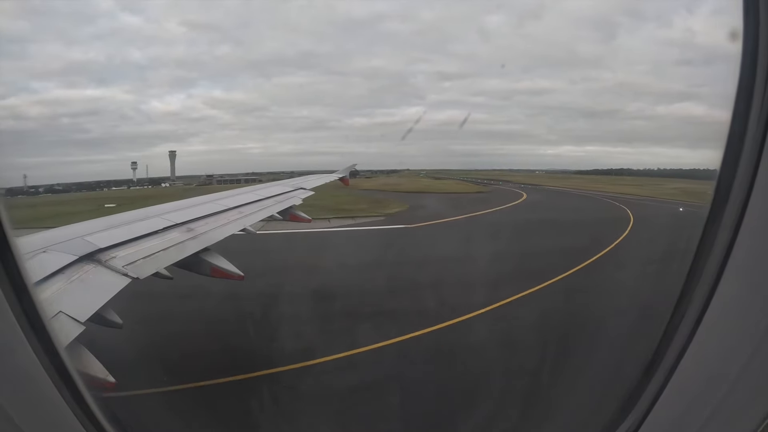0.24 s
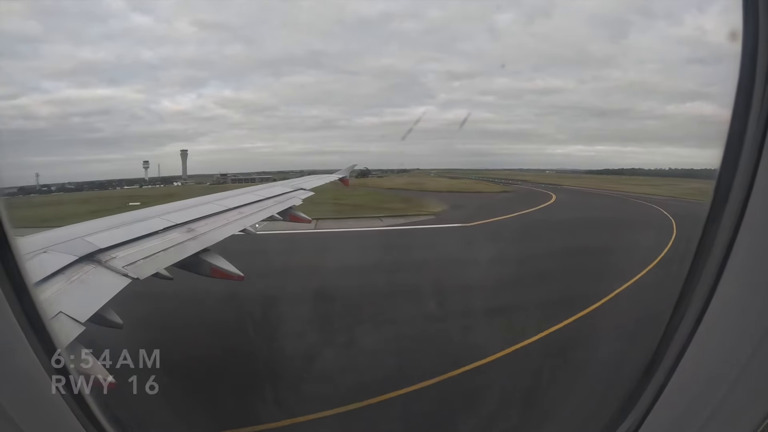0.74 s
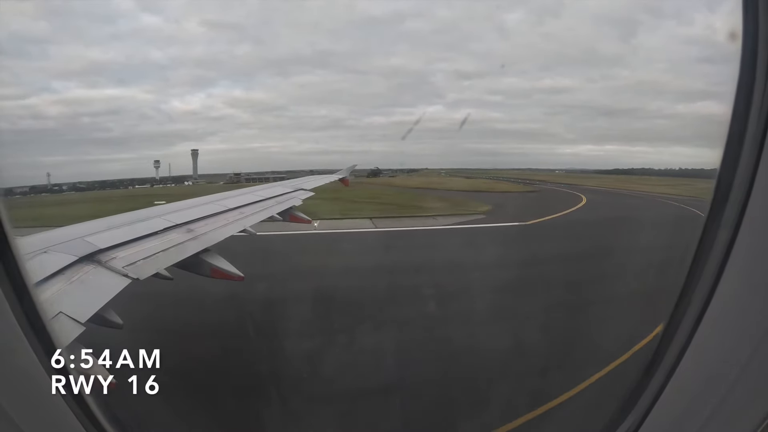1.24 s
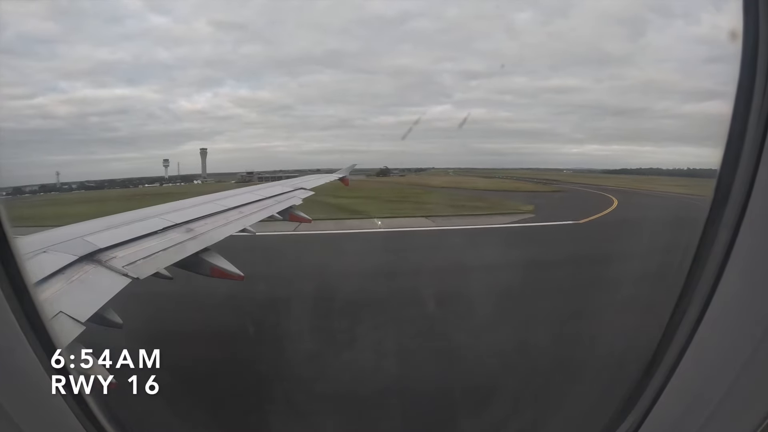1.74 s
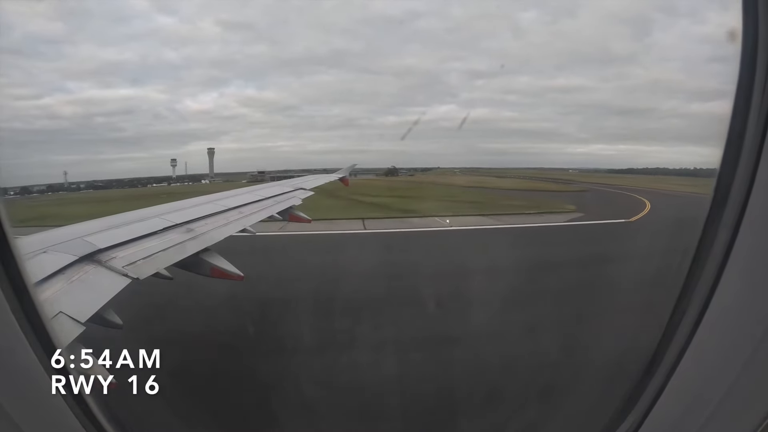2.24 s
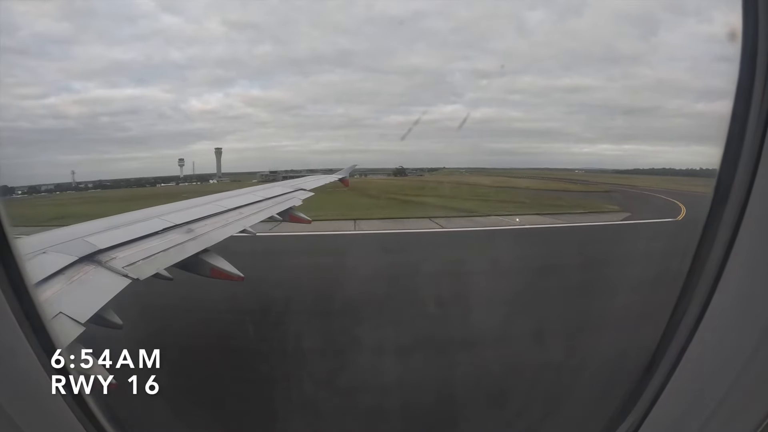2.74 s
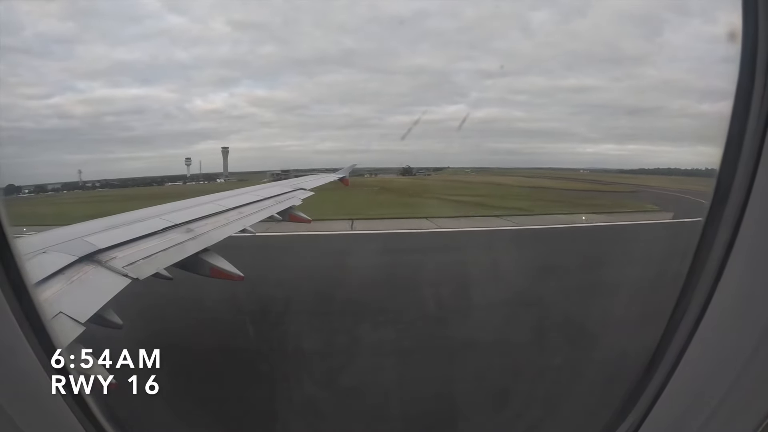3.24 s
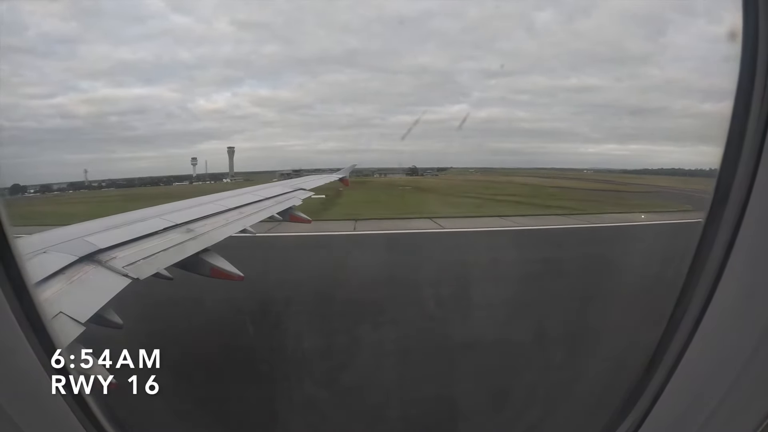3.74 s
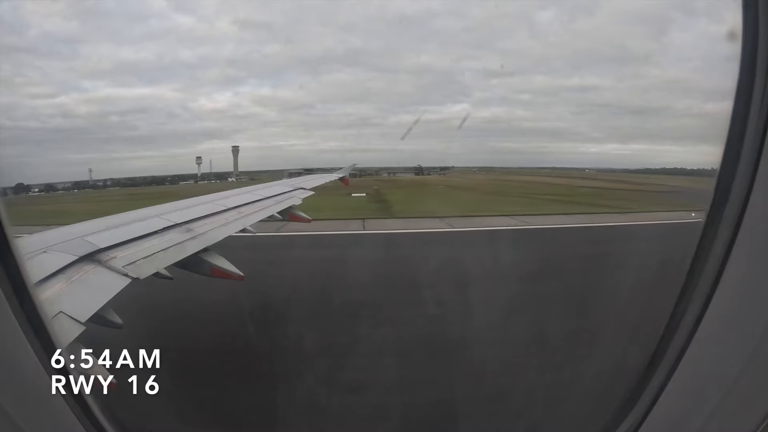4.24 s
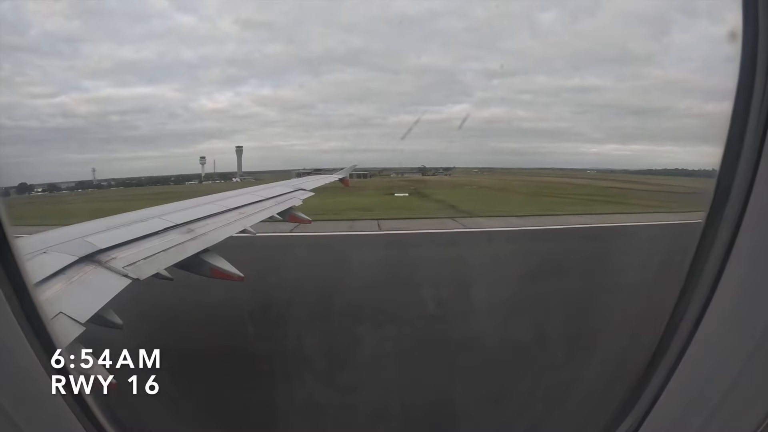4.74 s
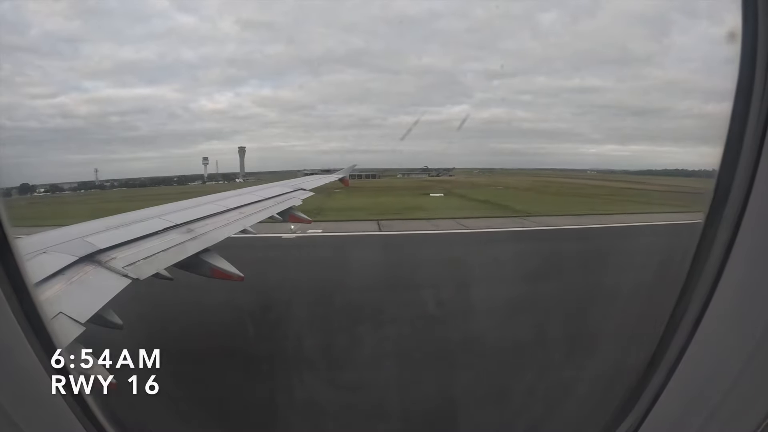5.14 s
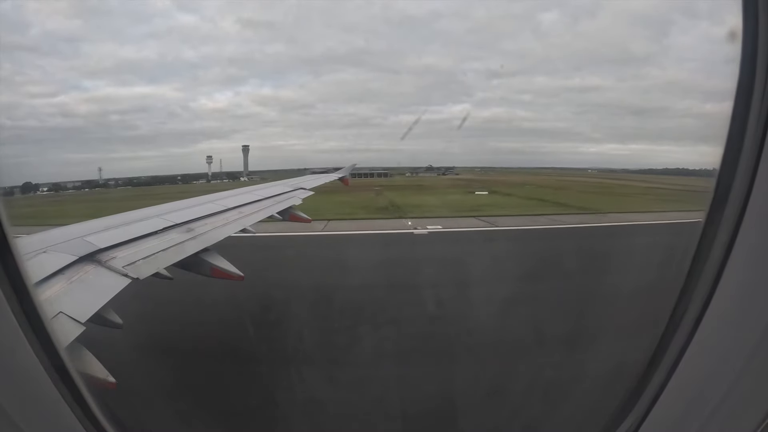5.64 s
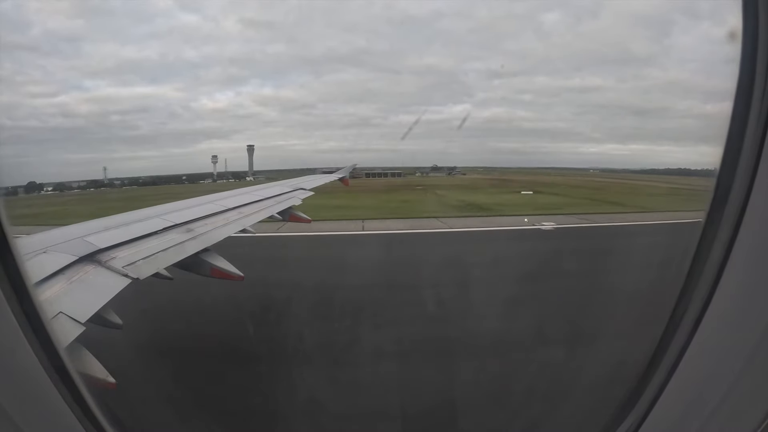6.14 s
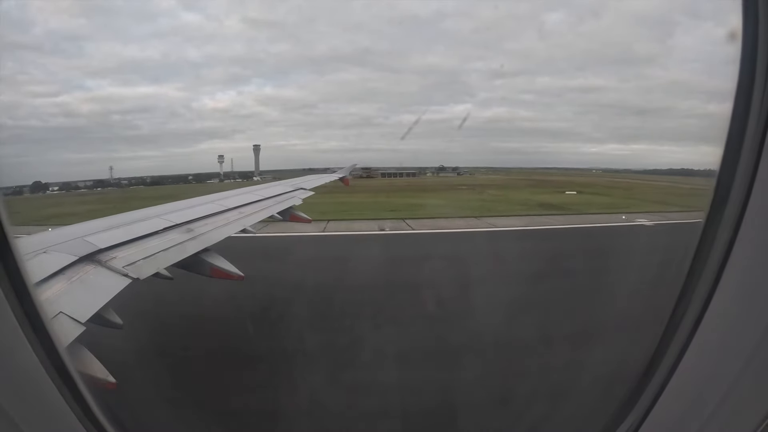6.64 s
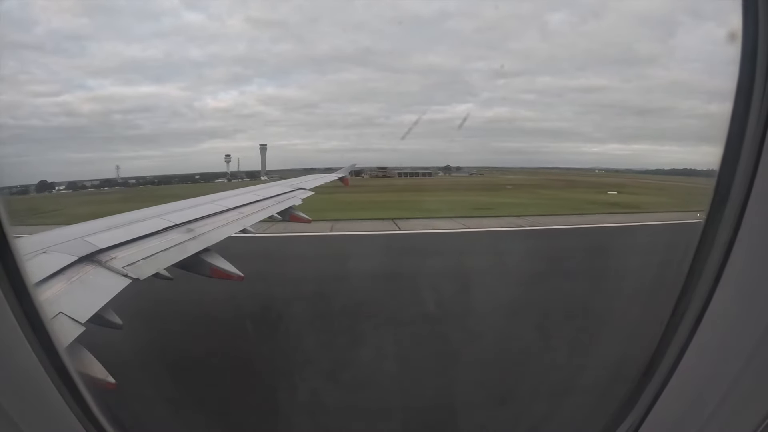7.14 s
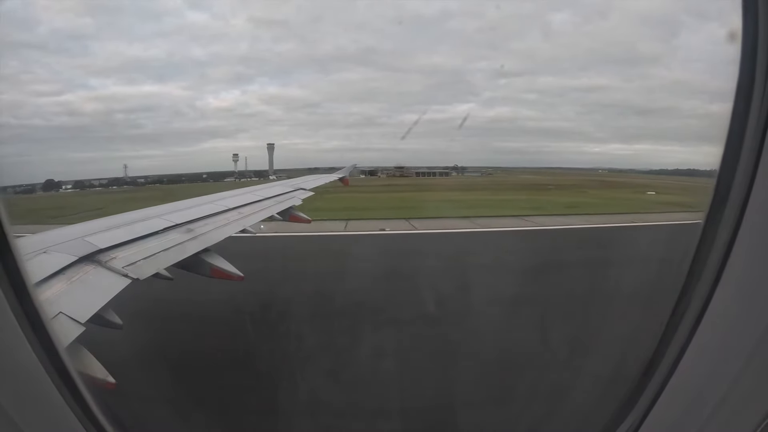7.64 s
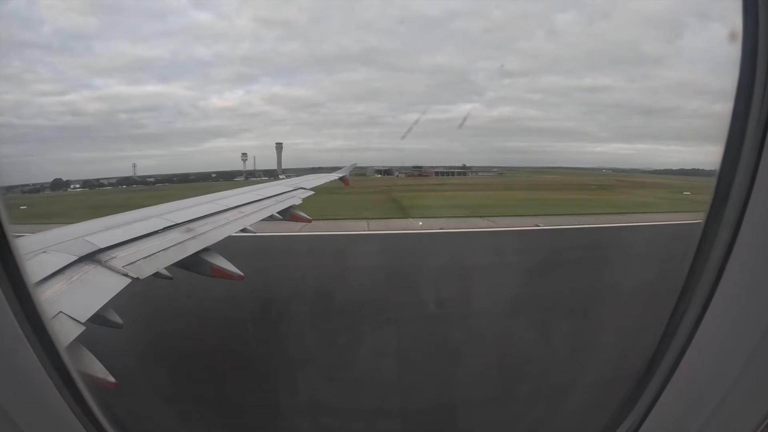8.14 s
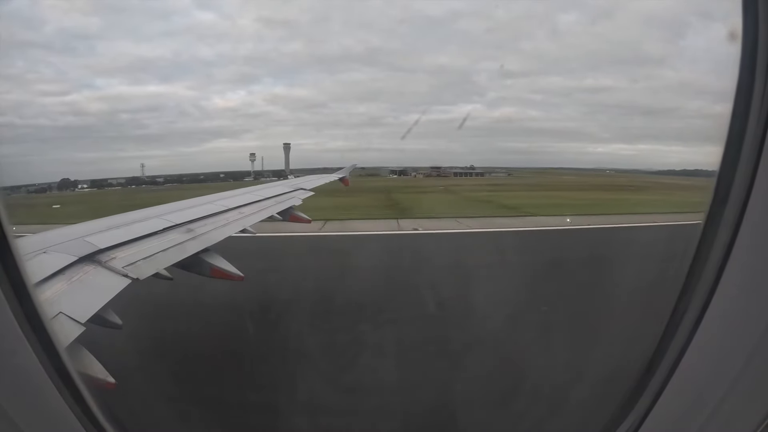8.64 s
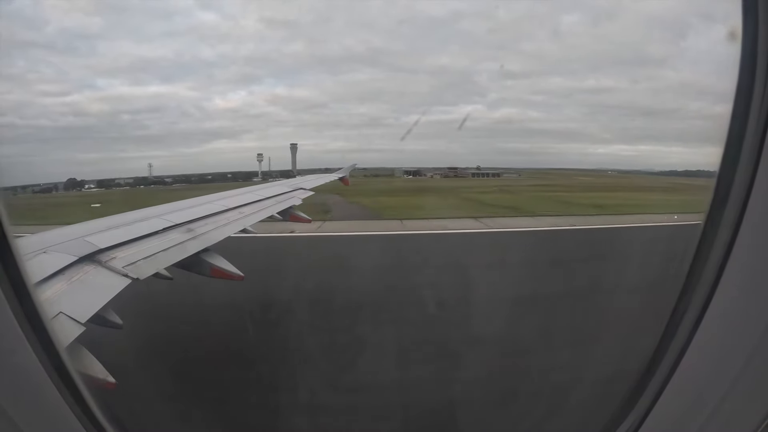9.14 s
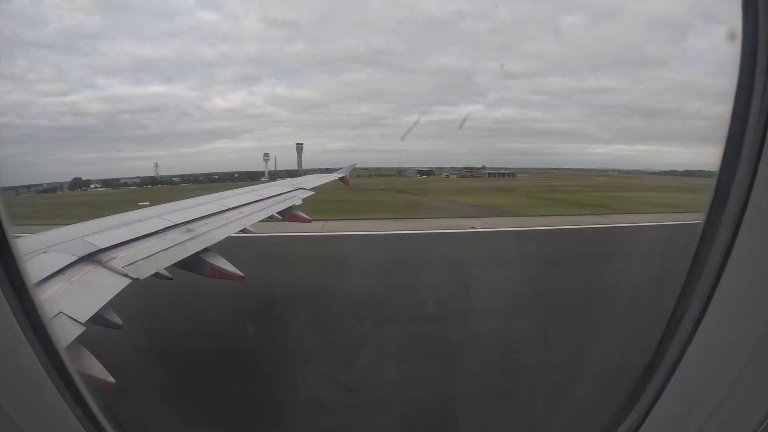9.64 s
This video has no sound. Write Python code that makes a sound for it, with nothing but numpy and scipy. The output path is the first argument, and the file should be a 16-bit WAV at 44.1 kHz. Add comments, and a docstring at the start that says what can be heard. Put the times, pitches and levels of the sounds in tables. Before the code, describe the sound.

Inside an airliner cabin, jet engines spool up with a climbing whine into a loud, steady, booming roar while plastic trim rattles constantly.

```python
"""Inside an airliner cabin, stereo microphone at a window seat by the wing, as the take-off roll begins.
Rubbing trim squeaks, then now and again later: short rough notes. The compressor whine climbs for three seconds
and blurs, lower engine tones swell and pass, and the roar and boom of the fuselage, resonant noise, grow
with thrust, then hold steady. Loose plastic rattles on top, gritty cracks of noise; air hisses throughout.
A small recorder's limiter holds the peaks down."""
import sys
import numpy as np
from scipy import signal
from scipy.fft import rfft, irfft
from scipy.io import wavfile
from scipy.ndimage import uniform_filter1d, minimum_filter1d

SR = 44100
rng = np.random.default_rng(int(sys.argv[2]) if len(sys.argv) > 2 else 0)


def file_out(sig):
    """Save sig as 16-bit WAV at sys.argv[1]."""
    # one column per channel
    cols = np.atleast_2d(sig).T
    # limit, then scale
    lim = np.clip(cols, -1, 1)
    pcm = np.round(lim * 32767).astype(np.int16)
    wavfile.write(sys.argv[1], SR, pcm)


N = 436590
TIME = np.arange(N) / SR
FREQS = np.maximum(np.fft.rfftfreq(N, 1 / SR), 1)

# engine spool-up: time_s [s], whine_hz [Hz], whine_db [dB], thrust [0-1]
SPOOL = [(0, 4970, -68, 0.05), (.5, 5400, -67.5, 0.08), (.9, 5780, -67.5, 0.24), (1.2, 6030, -66, 0.5),
         (1.5, 6500, -67, 0.78), (2, 6720, -70, 0.72), (2.5, 7120, -71, 0.95), (2.8, 7120, -71, 0.98),
         (9.9, 7470, -71.5, 0.99)]
# the loudest knocks of loose trim: start_s [s], level_db [dB, relative], edge_db [dB of extra treble]
KNOCKS = [(0.6838, -44.5, -2), (0.8507, -40, -3), (0.8914, -44.5, -1), (1.361, -37, -2), (1.54, -37, 7),
          (1.6552, -41.5, 2), (1.8144, -36, 4), (1.8714, -41, -2), (2.0263, -34.5, 0), (2.0337, -38, 0),
          (2.056, -39.5, -2), (2.063, -40, -2), (2.181, -40, -6), (2.212, -38.5, 4), (2.362, -40.5, 3),
          (2.4848, -36, -1), (2.492, -37.5, -3), (2.62, -36.5, 0), (2.6226, -36, -3), (2.6293, -37.5, 0),
          (2.639, -39, -4), (2.656, -42, -5), (2.7485, -38.5, -2), (2.7684, -41.5, 1), (2.7814, -36, 2),
          (2.805, -42, -4), (2.905, -39, 2), (2.9943, -39, 0), (3.017, -38, 3), (3.0293, -42, 0),
          (3.0365, -38.5, 1), (3.044, -38.5, 1), (3.0858, -37.5, 3), (3.1474, -41, 0), (3.155, -39.5, 0),
          (3.2274, -34.5, -5), (3.2632, -39, 8), (3.3468, -40.5, 3), (3.4, -40, 0), (3.453, -39, -2),
          (3.5004, -39.5, -9), (3.5114, -37.5, -3), (3.5922, -40.5, 8), (3.6245, -38, 2),
          (3.6567, -39.5, 3), (3.6741, -36.5, -7), (3.8438, -39, -2), (3.853, -37.5, -5),
          (3.897, -37.5, -6), (3.955, -39.5, -7), (3.9893, -40.5, 2), (4.061, -40, -2), (4.071, -35.5, 0),
          (4.1904, -41, -2), (4.225, -38.5, -1), (4.3296, -39, -4), (4.354, -38.5, -2), (4.4787, -37, -3),
          (4.51, -38.5, -4), (4.6047, -39.5, 4), (4.7644, -38.5, 5), (4.7736, -38, 0), (4.7872, -36, 2),
          (4.8609, -39, 5), (4.92, -38, -2), (4.973, -35, 1), (5.0313, -36, -1), (5.044, -39, -1),
          (5.1106, -41, -3), (5.1572, -38.5, -4), (5.1642, -36.5, -1), (5.3484, -39.5, -4),
          (5.3953, -41, -3), (5.5934, -38.5, -8), (5.6465, -35.5, 2), (5.6641, -40, 1), (5.6755, -37.5, -2),
          (5.8512, -40, 3), (5.865, -41.5, 1), (5.9763, -35, 1), (5.9998, -39.5, -3), (6.0914, -40.5, -2),
          (6.1274, -41.5, 0), (6.152, -37, 1), (6.266, -37, -5), (6.2759, -39.5, -2), (6.3615, -41.5, -2),
          (6.37, -41.5, 0), (6.3893, -41, 2), (6.4855, -39.5, 0), (6.502, -39, 0), (6.5179, -38, 1),
          (6.5762, -39.5, 1), (6.9255, -39.5, 0), (6.9971, -40, -2), (7.1077, -40.5, 0), (7.1311, -39, 5),
          (7.1863, -34.5, 1), (7.2877, -37, 2), (7.3067, -40, -2), (7.3496, -40, -5), (7.371, -35, -4),
          (7.4118, -40.5, 0), (7.421, -39.5, -2), (7.472, -37, -5), (7.4792, -38, -3), (7.653, -36.5, -2),
          (7.666, -38, -2), (7.7942, -41, -3), (7.905, -37, 4), (7.9554, -40, -7), (8.1074, -40, -3),
          (8.1835, -39.5, 1), (8.1986, -36, -1), (8.241, -37, -8), (8.3287, -39, 0), (8.3432, -40, -6),
          (8.3973, -38.5, 3), (8.681, -39, -6), (8.7584, -38, -3), (8.772, -34, 1), (8.8236, -37.5, -3),
          (8.8384, -37.5, -2), (8.873, -37, -2), (8.8817, -39.5, -3), (8.8996, -36.5, -8), (8.95, -37, -1),
          (8.9584, -38.5, -2), (8.9674, -37.5, -5), (9.055, -41, 4), (9.0855, -36.5, -2),
          (9.1786, -36.5, -3), (9.2174, -38, -3), (9.245, -39.5, -6), (9.2578, -41, -1), (9.355, -41.5, -4),
          (9.4247, -38, 1), (9.4843, -35.5, -3), (9.562, -37.5, -5)]


def undb(db):
    """Decibels to gain."""
    return 10 ** (np.asarray(db) / 20)


def unit(x):
    """Scale to rms 1."""
    return x / np.sqrt(np.mean(x ** 2))


def curves(rows):
    """Each column of a timed table, one value per sample."""
    time_s, *columns = np.transpose(rows)
    return [np.interp(TIME, time_s, column) for column in columns]


def colour(points):
    """Gain per frequency from (Hz, dB) points."""
    hz, db = np.transpose(points)
    return undb(np.interp(np.log(FREQS), np.log(hz), db))


def resonances(modes):
    """Gain per frequency of (Hz, width Hz, dB) humps."""
    return undb(sum(db / (1 + (2 * (FREQS - hz) / width) ** 2) for hz, width, db in modes))


def shaped(x, gain):
    """Filter by a gain per frequency."""
    return irfft(rfft(x) * gain, N)


def walk(rate):
    """Smooth random wander with rms 1 that changes about rate times a second."""
    return unit(shaped(rng.standard_normal(N), np.exp(-.5 * (FREQS / rate) ** 2)))


def hump(s, half_s):
    """A smooth swell to 1 around time s."""
    return np.exp(-np.minimum(((TIME - s) / half_s) ** 2, 40))


def ports(pair, gain):
    """Two unrelated signals reach the two microphone ports: alike in the bass, partly apart in the treble."""
    # share of unrelated sound at the ports: pitch_hz [Hz], side_minus_mid_db [dB]
    width_points = [(30, -28.5), (125, -27), (250, -21.5), (500, -13.5), (1000, -7.5), (2000, -8),
                    (4000, -3.5), (8000, -7)]
    # balance of the ports: pitch_hz [Hz], left_minus_right_db [dB]
    lean_points = [(60, 0.55), (150, 0.06), (500, 0.7), (1000, 2.5), (4000, 1.5), (8000, 1.2), (12000, 3.5)]
    mid, side = rfft(pair) * gain
    side = side * colour(width_points)
    lean = np.sqrt(colour(lean_points))
    left = (mid + side) * lean
    right = (mid - side) / lean
    return irfft(np.array([left, right]), N) / np.std(irfft(mid, N))


def through_cabin(spectrum, steady_s):
    """Turbulence heard through the cabin's resonances, its level even over spans longer than steady_s."""
    # resonances of the cabin: pitch_hz [Hz], width_hz [Hz], level_db [dB]
    cabin_modes = [(101, 17, 0.5), (165.1, 9.9, 3), (211.7, 24, 2.5), (290, 30, 1.5), (368, 17, -1),
                   (390, 41, 3), (452.4, 19, 4), (1200, 60, 1), (2770, 67, 2)]
    rolloff = 1 / (1 + (FREQS / spectrum[-1][0]) ** 10)
    x = ports(rng.standard_normal((2, N)), colour(spectrum) * resonances(cabin_modes) * rolloff)
    size = int(steady_s * SR)
    power = uniform_filter1d(uniform_filter1d(np.mean(x ** 2, axis=0), size), size)
    return x / np.sqrt(power)


def tone(hz, blur_hz, blur_rate):
    """A line of rms 1, its pitch blurred by turbulence; its phase differs more between the ports when high."""
    phase = 2 * np.pi * np.cumsum(hz + blur_hz * walk(blur_rate)) / SR
    return np.sqrt(2) * np.sin(np.array([phase, phase + 1.4 * np.minimum(hz / 1200, 1)]))


def vents(thrust):
    """A smooth hiss of moving air, shaped noise a little stronger under thrust."""
    # spectrum of the hiss: pitch_hz [Hz], level_db [dB per Hz, relative]
    air_spectrum = [(1000, 2.5), (2500, 0.5), (4000, 2), (4800, -3.5), (6500, -3), (8200, -2),
                    (9200, -21.5), (12000, -18), (15000, -38.5)]
    return ports(rng.standard_normal((2, N)), colour(air_spectrum)) * undb(-64.0 + 0.8 * thrust)


def trim_squeaks():
    """Panels stick and slip as the cabin flexes: brief, rough, high notes."""
    # rubbing trim: start_s [s], length_s [s], start_hz [Hz], end_hz [Hz], level_db [dB, relative],
    # rough_hz [Hz of pitch waver, relative]
    squeak_rows = [(.185, 0.16, 3740, 3690, -62, 60), (.425, .062, 3720, 4000, -64, 45),
                   (4.305, .07, 2820, 2760, -57, 40), (5.518, 0.055, 3090, 3320, -54.5, 130),
                   (5.77, 0.049, 3320, 3360, -59, 40), (5.89, .055, 2340, 2340, -54.5, 35),
                   (5.897, 0.06, 3290, 3330, -60, 40), (6.065, .06, 2340, 2400, -55, 35),
                   (7.097, 0.048, 3520, 3630, -60, 69.6), (8.96, .085, 2380, 2345, -49, 70),
                   (9.605, 0.083, 3670, 3770, -65, 12)]
    # stick-slip rate and its spread as a share of it
    slip_hz, slip_spread = 160, 0.13
    out = np.zeros((2, N))
    slip = np.sin(2 * np.pi * np.cumsum(slip_hz * (1 + slip_spread * walk(40))) / SR)
    waver = 0.97 * slip + 0.52 * walk(200)
    for start_s, length_s, start_hz, end_hz, level_db, rough_hz in squeak_rows:
        span = slice(int(start_s * SR), min(int((start_s + length_s) * SR), N))
        progress = np.linspace(0, 1, span.stop - span.start)
        hz = start_hz + (end_hz - start_hz) * progress + rough_hz * waver[span]
        phase = 2 * np.pi * np.cumsum(hz) / SR
        # a squeak catches quickly and trails off
        swell = np.sin(np.pi * progress ** 0.7)
        out[:, span] += undb(level_db) * swell * np.sin(np.array([phase, phase + 0.72]))
    return out * undb(3.0 + 3 * slip + 2 * walk(90))


def trim_taps(thrust):
    """Energy of each light tap: they come in bouts as the cabin flexes, grow with thrust and crowd round knocks."""
    # level at full thrust, and how far the level lies from that at no thrust
    chatter_db, chatter_idle_db = -61.25, -21.5
    # unsteady flexing of the cabin: rate, its spread as a share, depth
    flex_hz, flex_spread, flex_db = 9.2, 0.29, 6.5
    # bouts that also build and ease at random: depth, rate per s
    bout_db, bout_rate = 2, 3.5
    # flurry of taps with each knock: level against the knock, half length, lag of its middle
    flurry_db, flurry_s, flurry_lag_s = -7.5, 0.044, 0.003
    # mean of the uneven gaps between taps; spread of their strength
    tap_gap_s, scatter_db = .0085, 4

    flex = np.sin(2 * np.pi * np.cumsum(flex_hz * (1 + flex_spread * walk(1.7))) / SR)
    bouts = np.minimum(walk(bout_rate), 1)
    shaking_db = chatter_db + chatter_idle_db * (1 - thrust) + flex_db * flex + bout_db * bouts
    shaking = undb(shaking_db)
    for s, db, _ in KNOCKS:
        shaking = np.maximum(shaking, undb(db + flurry_db) * hump(s + flurry_lag_s, flurry_s))
    # one tap each time the uneven count of gaps passes a whole number
    cycles = np.cumsum(np.maximum(1 + 0.43 * walk(80), 0)) / (tap_gap_s * SR)
    strength = undb(scatter_db * np.minimum(rng.standard_normal(N), 1.3))
    taps = np.diff(np.floor(cycles), prepend=0) * strength
    return (taps * shaking) ** 2


def cracks(contacts, edge_db, body_db, press_s=0.0012, ring_s=0.002, grit_db=-2.0):
    """Each contact presses in and rings out as a gritty crack, with edge_db more treble, body_db more middle."""
    # spectrum of the cracks: pitch_hz [Hz], level_db [dB per Hz, relative]
    rattle_spectrum = [(500, -0.5), (1200, 16.5), (2200, 6), (3300, -0.5), (4700, -2), (6000, 0),
                       (8200, -1), (9200, -22.5), (10900, -17.5), (13200, -16.5), (15000, -36)]
    # resonances of the trim: pitch_hz [Hz], width_hz [Hz], level_db [dB]
    trim_modes = [(1230, 170, 7), (2800, 160, 9.5), (3200, 160, 4.5), (3940, 720, 8), (5950, 350, 4),
                  (7150, 300, 1.5), (8050, 300, 2.5), (10700, 1400, 8.5)]
    # the treble of a hard contact starts at edge_hz; the panel's body lies below body_hz
    edge_hz, body_hz = 7600, 2600

    energy = signal.lfilter([1], [1, -np.exp(-2 / (ring_s * SR))], contacts + 1e-18)
    press = signal.windows.hann(int(2 * press_s * SR) + 3)
    energy = np.convolve(energy, press / press.sum(), "same")
    grit = np.sqrt(energy) * unit(undb(grit_db * walk(2500))) * rng.standard_normal((2, N))
    x = ports(grit, colour(rattle_spectrum) * resonances(trim_modes)) * np.std(grit[0])
    edge = shaped(x, 1 - 1 / (1 + (FREQS / edge_hz) ** 10))
    body = shaped(x, 1 / (1 + (FREQS / body_hz) ** 4))
    return x + edge * (undb(edge_db) - 1) + body * (undb(body_db) - 1)


def trim_rattle(thrust, knock_db=0.5, knock_body_db=3.5, tap_edge_db=-3.0, tap_body_db=-2, variety_db=3.5):
    """Loose plastic knocks, dull or sharp and full in body, among lighter taps whose tone varies at random."""
    knocks = np.zeros(N)
    for s, db, _ in KNOCKS:
        knocks[int(s * SR)] += undb(db + knock_db) ** 2
    knock_edge_db = curves(KNOCKS)[-1]
    edge_db = tap_edge_db + variety_db * walk(40)
    body_db = tap_body_db + variety_db * walk(40)
    taps = cracks(trim_taps(thrust), edge_db, body_db)
    return cracks(knocks, knock_edge_db, knock_body_db) + taps


def engines():
    """The compressor's whine climbs and spreads into a wide whistle; lower tones, clean or rough, swell and pass."""
    # tones and rough bands through the cabin wall, each: time_s [s], pitch_hz [Hz], level_db [dB]
    drone = [(0, 157.7, -46), (.4, 161, -34.5), (.9, 163.5, -32.5), (1.4, 178, -46)]
    hum = [(0, 491, -47), (.25, 500, -35.5), (.45, 507.5, -41.5), (.72, 517, -37), (1.02, 527, -44.5),
           (1.3, 535, -45)]
    fan = [(1.2, 1560, -69), (1.42, 1560, -54.5), (1.56, 1590, -64), (1.68, 1614, -56), (1.77, 1593, -50.5),
           (1.91, 1630, -49), (1.94, 1640, -60)]
    full_fan = [(5.5, 1192, -52.5), (6.8, 1230, -57), (7.4, 1232, -50), (8, 1220, -62.5), (9.9, 1247, -65)]
    fan_rush = [(1.2, 1413, -68), (1.42, 1440, -55.5), (1.85, 1462, -56), (2.1, 1490, -63)]
    howl = [(1.9, 916, -64.5), (2.5, 911, -52), (9.9, 929.6, -53)]
    # how far turbulence blurs each pitch, as a share of it
    tracks = ((drone, 0.004), (hum, 0.0024), (fan, .006), (full_fan, .006), (fan_rush, 0.051), (howl, .028))

    whine_hz, whine_db, thrust = curves(SPOOL)
    narrow = undb(-5 - 7.5 * thrust) * tone(whine_hz, blur_hz=45, blur_rate=58)
    wide = undb(-0.5) * tone(whine_hz, blur_hz=240 + 170 * thrust, blur_rate=360)
    out = (narrow + wide) * undb(whine_db + 1.2 * walk(35))
    for track, blur in tracks:
        hz, db = curves(track)
        within = (TIME >= track[0][0]) & (TIME <= track[-1][0])
        sounding = uniform_filter1d(1. * within, size=4000)
        # the wider the blur in Hz, the faster the tone flickers
        rate = 4 + 1.5 * blur * track[0][1]
        level = sounding * undb(db + 0.77 * walk(rate))
        out = out + level * tone(hz, blur_hz=blur * hz, blur_rate=rate)
    return out


def fuselage(thrust):
    """Wheels rumble on the runway, the hull booms and jets roar with thrust; the boom brightens as thrust builds."""
    # spectra of wheels, hull and jets, each: pitch_hz [Hz], level_db [dB per Hz, relative]
    rumble_spectrum = [(8, -16.5), (20, -4), (30, -12), (38, -10.5), (46, 2), (57, -7), (72, 0.5), (88, -9),
                       (105, -10), (150, -31)]
    boom_spectrum = [(70, -27), (100, -10), (125, -2.5), (165, -1), (220, -2.5), (300, -6.5), (390, -11.5),
                     (430, -18.5), (520, -18.5), (620, -28.5), (800, -47), (1200, -74.5)]
    roar_spectrum = [(300, -16), (550, -0.5), (720, 3.5), (780, -2), (850, -5.5), (910, -2), (1250, -7.5),
                     (1450, -9.5), (2100, -16.5), (3000, -25), (4500, -33), (8000, -34.5)]
    # rough patches of runway under the wheels: middle_s [s], half_length_s [s], extra_db [dB]
    bump_rows = [(1.5, 0.21, 0.5), (2.696, 0.06, 3.5), (3.615, .28, 2), (4.45, 0.058, 4.5),
                 (5.003, .13, 2.5), (5.96, 0.38, 1), (6.6, 0.27, 3), (7.298, 0.18, 3), (8.549, 0.65, 1),
                 (9.549, 0.26, 1.5)]

    # the wheels also swell a little at random on the uneven runway
    wheels_db = -19 + 1.2 * walk(1.5)
    wheels_db = wheels_db + sum(db * hump(s, half_s) for s, half_s, db in bump_rows)
    wheels = through_cabin(rumble_spectrum, steady_s=0.33) * undb(wheels_db)

    boom_db = -14.5 - 1.35 * (1 - thrust)
    # the upper boom swells once in mid-roll
    upper_db = -7.5 * (1 - thrust) + 1 * hump(4.7, half_s=0.93)
    boom = through_cabin(boom_spectrum, steady_s=0.19)
    upper = shaped(boom, 1 - 1 / (1 + (FREQS / 260) ** 4))
    boom = (boom + upper * (undb(upper_db) - 1)) * undb(boom_db)

    # the jets surge a little as their eddies pass
    roar_db = -36.5 - 8 * (1 - thrust) + 0.83 * walk(29.0)
    roar = through_cabin(roar_spectrum, steady_s=0.032) * undb(roar_db)
    return wheels + boom + roar


def scene():
    """Everything heard at the window seat."""
    thrust = curves(SPOOL)[-1]
    return vents(thrust) + trim_squeaks() + trim_rattle(thrust) + engines() + fuselage(thrust)


def record(dry):
    """The recorder's limiter eases the tallest swings down; the sound opens and closes softly, its top cut."""
    top_hz, fade_s = 15300, 0.006
    knee = undb(-6.5)
    peak = np.maximum(np.abs(dry).max(axis=0), knee)
    gain = minimum_filter1d((knee / peak) ** 0.48, size=700)
    gain = uniform_filter1d(uniform_filter1d(gain, size=350), size=350)
    fade = np.minimum(np.minimum(TIME, TIME[-1] - TIME) / fade_s, 1)
    top_cut = signal.ellip(8, .2, 70, top_hz, fs=SR, output="sos")
    return signal.sosfilt(top_cut, dry * gain * fade * undb(1.18))


dry = scene()
out = record(dry)
file_out(out)
```